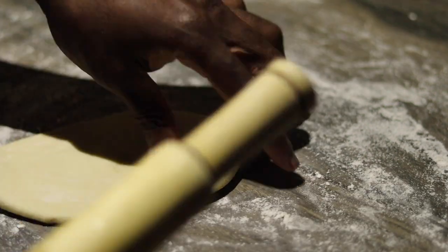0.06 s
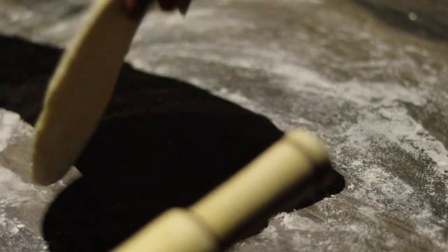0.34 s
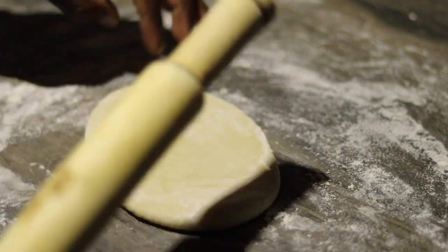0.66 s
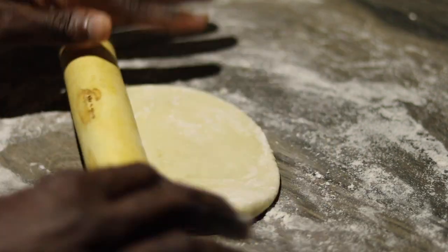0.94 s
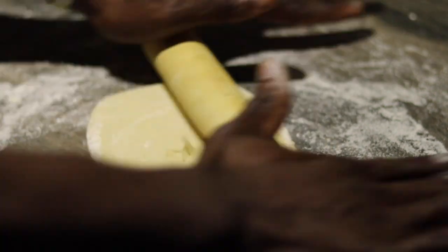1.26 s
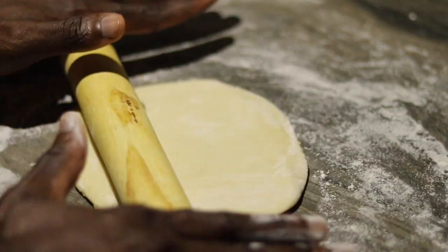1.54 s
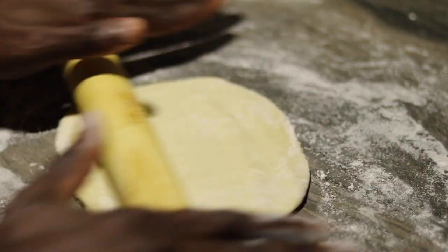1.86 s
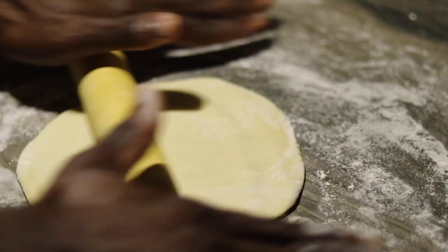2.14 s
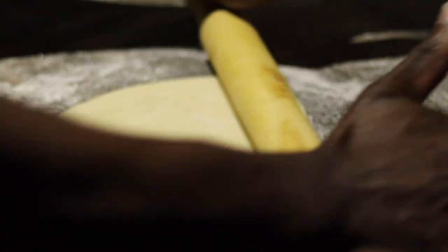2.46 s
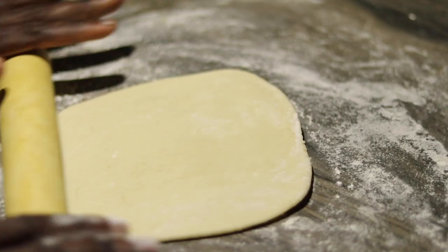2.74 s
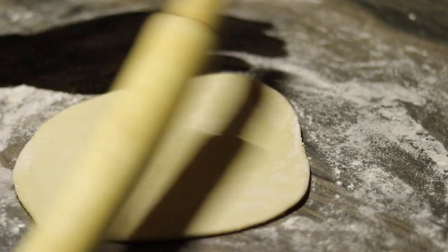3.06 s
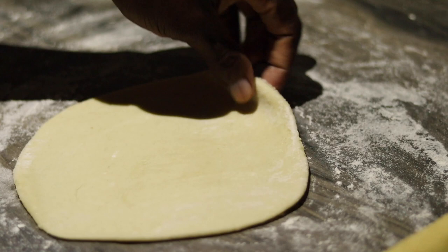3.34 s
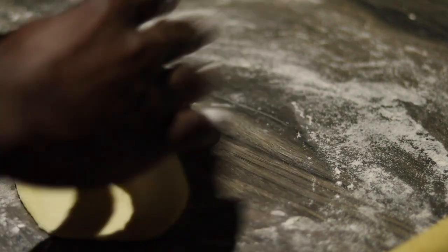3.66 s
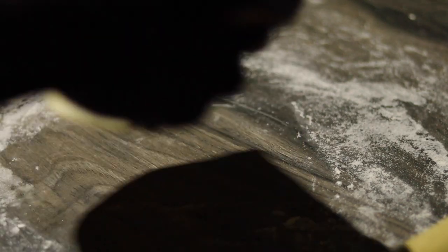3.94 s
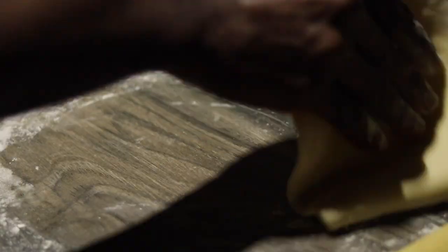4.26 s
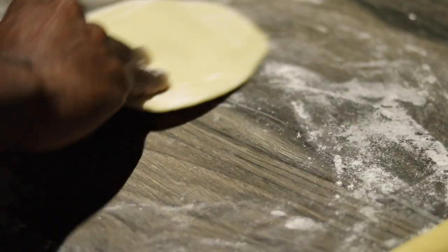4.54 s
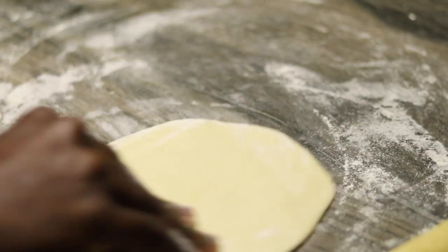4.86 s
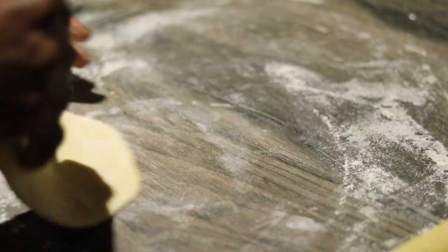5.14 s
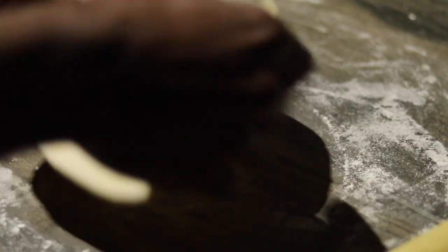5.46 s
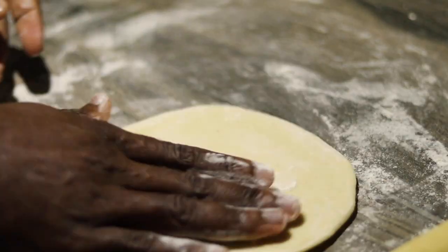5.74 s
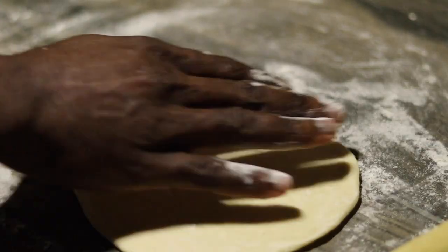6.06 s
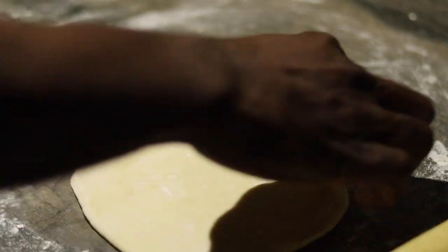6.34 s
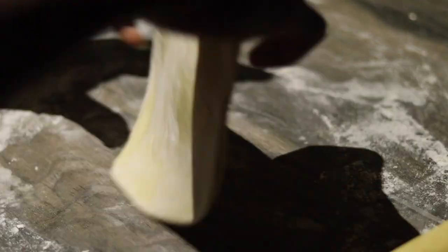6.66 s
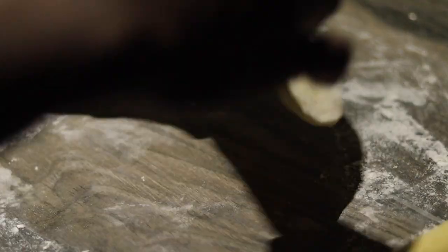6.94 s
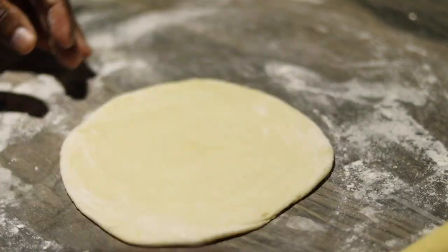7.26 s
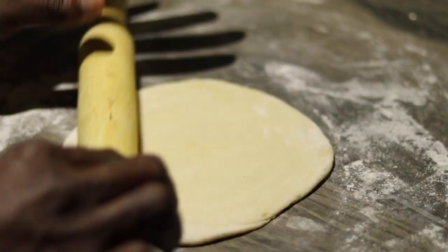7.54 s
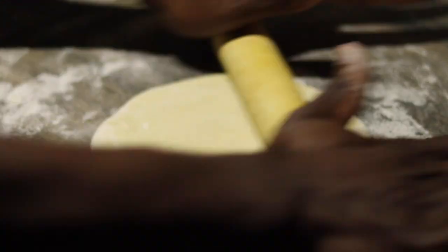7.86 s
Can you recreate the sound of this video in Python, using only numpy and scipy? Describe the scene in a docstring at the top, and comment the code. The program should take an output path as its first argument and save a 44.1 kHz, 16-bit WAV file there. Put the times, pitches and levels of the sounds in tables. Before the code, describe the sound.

Dough slaps and slides on a floured wooden board while a rolling pin rolls and knocks, over a steady appliance hum.

```python
"""Flatbread dough is rolled out on a floured wooden board, over the steady hum of a kitchen appliance.
The dough slaps down at 0.7 s; from 1.3 s the pin rolls, then knocks as it is put down (2.7-3.6 s).
Hands and dough brush through the flour, and the dough slaps again at 5.6 s and 7.2 s.
At 7.4 s the pin is picked up, squeaks faintly and rolls on. Every weight shakes the table.
A close stereo microphone hears mono bass and very wide treble."""
import sys
import numpy as np
from scipy import signal
from scipy.fft import rfft, irfft, next_fast_len
from scipy.io import wavfile
from scipy.ndimage import map_coordinates

SR = 44100
rng = np.random.default_rng(int(sys.argv[2]) if len(sys.argv) > 2 else 0)


def master(y):
    """Save y as 16-bit WAV."""
    cut = np.clip(np.atleast_2d(y).T, -1, 1)
    pcm = np.round(cut * 32767)  # scale
    wavfile.write(sys.argv[1], SR, pcm.astype(np.int16))


N = 357515


def knocks(board_db=-8, side_db=-3):
    """Wood on wood: pin and board ring together, brighter for a harder contact."""
    # Each row: start in s, level in dB, low-pass in Hz, relative pin ring in dB,
    # band favoured by the struck spot in Hz, its lift in dB.
    contacts = [(2.745, -31, 450, -19, 300, -4), (2.84, -36.5, 450, -15, 330, 12.5),
                (2.9612, -19, 6000, -12, 4700, 5), (2.9635, -16, 2600, -1, 1280, 12),
                (2.9644, -22, 800, -24, 520, 11.5), (2.971, -29, 1800, -2, 1400, 4),
                (3.011, -22, 750, -21, 400, 6), (3.061, -35, 900, -1, 620, 6),
                (3.104, -37, 600, -20, 500, 5), (3.3841, -34, 8000, -14, 4700, 4),
                (3.3852, -17, 1410, -9, 1150, 9.5), (3.394, -20, 1400, -16, 625, 7),
                (3.4992, -16, 1740, -1.5, 1400, 6), (3.505, -25, 1200, -8, 830, 12.5),
                (3.526, -21, 700, -22, 450, 6), (3.549, -28.5, 700, -11, 480, 5),
                (3.572, -30, 600, -12, 500, 4.5), (3.603, -42, 500, -20, 570, 5),
                (7.367, -37.5, 4950, -10, 4600, 5), (7.381, -32, 3520, -9, 900, -1),
                (7.4105, -32, 1800, -17, 290, 6.5), (7.4336, -34, 4200, -7, 540, 8)]
    # Pin bending modes and board modes. Each row: frequency in Hz, level in dB, t60 in s.
    pin_modes = [(1033, -13.5, 0.14), (1273, -6, 0.051), (1315, -10, 0.062), (1500, -15.5, 0.06),
                 (1802, 2, 0.095), (1790, -13.5, 0.25), (1970, -10.5, 0.11), (2920, -11.5, 0.12),
                 (2950, -6.5, 0.09), (4640, -11, 0.056), (6400, -17, 0.12)]
    board_modes = [(254, -2, 0.21), (296.5, -3, 0.27), (409.5, -18.5, 0.29), (450, -11, 0.35),
                   (535, -12.5, 0.28), (577, -8.5, 0.2), (614, -16, 0.49), (674, -3.5, 0.16),
                   (844, -11.5, 0.21), (993, -7.5, 0.21)]
    # Contact noise. Each row: frequency in Hz, relative density in dB.
    wood_spectrum = [(60, -7.5), (130, -10.5), (450, -2), (1000, -12.5), (1400, -14.5), (1900, -16.5),
                     (2300, -18.5), (2700, -24.5), (2950, -13), (3500, -21), (4100, -31), (4650, -26),
                     (5300, -36), (12000, -39), (16000, -53)]
    out = np.zeros((2, N))
    for start_s, db, bright_hz, pin_db, spot_hz, lift_db in contacts:
        pin = amp(pin_db) * ring(pin_modes, scatter_db=-1.5, detune=.008, waver_rad=.35)
        board = amp(board_db) * ring(board_modes, scatter_db=2, detune=.004, waver_rad=.35)
        blow = pin + board + burst(wood_spectrum, direct_t60_s=0.023, room_db=-7.5)
        add(out, start_s, amp(db) * resonance(soften(blow, bright_hz), spot_hz, lift_db))
    return out * amp([[0], [side_db]])


def slaps(side_db=-3, crack_t60_cycles=10, crack_right=.35, attack_s=0.00032, snap_t60_s=.007):
    """Limp dough lands with a snap and a dull smack; trapped air cracks and colours the clap."""
    # Each row: start in s, level in dB, low-pass in Hz, air pocket pitch in Hz, its lift in dB,
    # relative crack in dB, smack in dB.
    landings = [(0.738, -36.5, 3500, 1110, 7, -6, -44), (0.744, -28, 8050, 1300, 10, 15, -32),
                (0.7480, -30, 5000, 3500, 4.5, 5, -27.5), (0.7531, -31.5, 6000, 2340, 11.5, 21.5, -26),
                (0.758, -33.5, 3800, 1750, 7, 3, -31), (5.632, -39, 3600, 880, -1, 1, -34.5),
                (5.645, -38, 5030, 1700, 4, 6, -34), (5.658, -44, 4000, 1900, 7, -2, -40),
                (5.683, -38.5, 3000, 1820, 8, 9, -38), (7.184, -23.5, 7500, 2330, 3, 4, -28.5),
                (7.1849, -23, 6000, 2180, 10.5, 22, -27), (7.1916, -25.5, 3000, 2050, 4, 14, -25.5),
                (7.204, -24.5, 4200, 2000, 9.5, -3, -27.5)]
    # Clap, dough skin on the board, smack. Each row: frequency in Hz, relative density in dB.
    clap_spectrum = [(60, -9), (200, -21), (520, 4.5), (700, -3.5), (1200, -3), (2100, -6), (3300, -11),
                     (6000, -11.5), (11500, -12.5), (13500, -24), (15000, -42)]
    snap_spectrum = [(300, -22), (1500, 2), (3500, -0.5), (6000, -2), (11500, -10.5), (15000, -27)]
    smack_spectrum = [(60, -21), (150, 13.5), (270, 4), (540, 7.5), (850, 6), (1500, -21), (4000, -55)]
    out, t = np.zeros((2, N)), age()
    onset = 1 - np.exp(-t / attack_s)
    for start_s, db, bright_hz, pocket_hz, lift_db, crack_db, smack_db in landings:
        clap = soften(burst(clap_spectrum, direct_t60_s=0.032, room_db=-10.5), bright_hz)
        clap = resonance(clap, pocket_hz, lift_db, q=2.5)
        snap = noise(snap_spectrum, len(t)) * amp(crack_db - 12.5 - 60 * t / snap_t60_s)
        smack = amp(smack_db) * burst(smack_spectrum, direct_t60_s=0.067, room_db=-12)
        impact = onset * (amp(db) * (clap + snap) + smack) * amp([[0], [side_db]])
        cycles = pocket_hz * t
        crack_gain = amp(db + crack_db - 60 * cycles / crack_t60_cycles) * np.minimum(cycles, 1)
        crack = crack_gain * np.sin(2 * np.pi * cycles)
        add(out, start_s, impact + np.outer([1, -crack_right], crack))
    return out


def thuds(side_db=-9):
    """The table top booms and its frame sways under each weight."""
    # Each row: start in s, top boom in dB, frame sway in dB, rise in s.
    weights = [(0.134, -40, -34, 0.017), (0.753, -23.5, -39.5, 0.005), (1.118, -49, -42, .02),
               (2.967, -14.5, -45, 0.0058), (3.385, -11.5, -48, 0.02), (3.501, -13, -39, 0.026),
               (6.279, -32.5, -40, 0.016), (6.418, -32, -41.5, 0.017), (7.185, -26.5, -32, 0.0018),
               (7.4, -32.5, -40, 0.0092), (7.686, -15.5, -28, 0.015)]
    # Each row: frequency in Hz, level in dB, t60 in s.
    top_modes = [(121, -38, 0.099), (135.7, -14, 0.35), (167.9, -1.5, 0.3), (180.2, -19, 0.43)]
    frame_modes = [(49.2, 4, 0.6), (64.3, -15, 0.35), (76.3, -1, 0.39)]
    out = np.zeros((2, N))
    for start_s, boom_db, sway_db, rise_s in weights:
        boom = amp(boom_db) * ring(top_modes, scatter_db=1)
        sway = amp(sway_db) * ring(frame_modes, scatter_db=1)
        add(out, start_s, (boom + sway) * (1 - np.exp(-age() / rise_s)))
    return out * amp([[0], [side_db]])


def bumps(rise_s=0.0067):
    """A fingertip or the pin bumps the board through the dough: one dull note."""
    # Each row: start in s, level in dB, pitch in Hz, t60 in s.
    blows = [(5.752, -27.5, 279, 0.083), (6.521, -26, 231, 0.19), (7.405, -26, 268, 0.13),
             (7.432, -26, 533, 0.12)]
    out = np.zeros((2, N))
    for start_s, db, hz, t60_s in blows:
        add(out, start_s, ring([(hz, db, t60_s)], scatter_db=3) * (1 - np.exp(-age() / rise_s)))
    return out


def rolling():
    """The pin goes out and back at half-sine speed; dough muffles the flour crushed under it."""
    # Each row: start in s, length in s, flour hiss in dB, palms on the handles in dB, rumble in dB.
    pushes = [(1.266, 0.21, -61.5, -52.5, -51), (1.49, 0.22, -63, -68, -47), (1.68, 0.18, -63.5, -70, -59),
              (1.873, 0.31, -58.5, -64, -45), (2.1, 0.47, -65, -63, -52), (2.552, 0.43, -60, -55.5, -47),
              (7.639, 0.17, -62.5, -49, -38), (7.77, 0.41, -59, -48.5, -51)]
    t, moves = np.arange(N) / SR, []
    for start_s, length_s, *levels_db in pushes:
        speed = np.sin(np.pi * np.clip((t - start_s) / length_s, 0, 1))
        moves.append((speed, levels_db))
    return friction(moves, bright_hz=12000)


def sliding(weight_db=-5):
    """Hands and dough sweep through loose flour; their weight rumbles the board."""
    # Each row: start in s, length in s, flour hiss in dB, skin rub in dB.
    slides = [(0.331, 0.053, -55, -68), (3.096, 0.58, -64, -54), (3.69, 0.55, -66, -61),
              (4.158, 0.38, -63, -54), (4.456, 0.34, -56, -52), (4.573, 0.16, -60, -54),
              (4.769, 0.23, -57.5, -54), (4.96, 0.2, -60, -59), (5.092, 0.49, -68, -59.5),
              (5.586, 0.27, -66.5, -56), (5.823, 0.32, -60.5, -47), (5.888, 0.12, -57.5, -39.5),
              (6.105, 0.13, -63, -47), (6.263, 0.68, -69, -58), (6.484, 0.15, -62, -44),
              (6.802, 0.51, -65, -52), (7.275, 0.5, -74, -50)]
    moves = [(slide_gain(start_s, length_s), (hiss_db, rub_db, rub_db + weight_db))
             for start_s, length_s, hiss_db, rub_db in slides]
    return friction(moves, bright_hz=18000)


def friction(moves, bright_hz, skin_db=-1, grit_per_s=220, grit_db=6):
    """Flour hisses, coarse grains crackle, skin catches and slips, the pressed board rumbles."""
    # Each row: frequency in Hz, relative density in dB.
    flour_spectrum = [(500, -26), (1500, 2.5), (3000, 1.5), (5000, -4.5), (7500, 0), (12000, -3),
                      (13800, -14), (15000, -22)]
    skin_spectrum = [(200, 12), (700, 3), (1700, 6), (3500, -4.5), (6000, -8), (12000, -44)]
    rumble_spectrum = [(25, -24), (45, 5), (85, -5), (140, -3.5), (330, -15), (700, -13.5), (2000, -81)]
    hiss, rub, press = np.sqrt(sum(np.outer(amp(levels_db), gain) ** 2 for gain, levels_db in moves))
    grains = rng.standard_normal((2, N)) * (1 + amp(grit_db) * (rng.random(N) < grit_per_s / SR))
    flour = colour(grains, flour_spectrum) * amp(wobble(900) + wobble(35))
    skin = unit(noise(skin_spectrum) * amp(2 * wobble(400) + 1.1 * wobble(30)))
    flour = under_hand(soften(flour, bright_hz))
    return hiss * flour + amp(skin_db) * rub * skin + press * noise(rumble_spectrum)


def under_hand(x, delay_s=.00022, echo_gain=.3):
    """The moving hand reflects the hiss across a changing gap, sweeping its colour."""
    samples = np.arange(N)
    late = samples - delay_s * np.exp(.25 * wobble(3)) * SR
    echo = np.array([np.interp(late, samples, channel) for channel in x])
    return unit(x + echo_gain * echo)


def ticks(skirt_db=-12):
    """Fingers and sticky dough make small contacts, each a puff of band noise."""
    # Each row: start in s, level in dB, pitch in Hz, time to fall 30 dB in s, width as frequency ratio.
    touches = [(0.074, -55, 6760, .015, 1.2), (0.178, -54, 6300, 0.035, 1.2), (1.546, -48, 1500, 0.01, 1.8),
               (1.922, -41.5, 4300, 0.012, 2.5), (2.151, -52, 6500, .015, 1.8),
               (2.298, -43, 4170, 0.0097, 0.88), (3.178, -40.5, 2880, 0.027, 1.04),
               (3.94, -57, 7000, .04, 2.2), (4.36, -52, 2570, 0.03, 2.2), (5.76, -52, 4770, 0.093, 1),
               (5.854, -44.5, 3340, 0.17, 1.4), (6.445, -49.5, 5000, 0.025, 2.2),
               (6.522, -41.5, 3840, 0.21, 1.33), (7.371, -45, 6400, 0.033, 1.1),
               (7.675, -44.5, 3220, 0.059, 1.1), (7.92, -44, 5500, .015, 2)]
    out, t = np.zeros((2, N)), age()
    for start_s, db, hz, fall_s, spread in touches:
        band = [(hz / 8, -40), (hz / spread, skirt_db), (hz, 0),
                (hz * spread, skirt_db), (hz * 3, -50), (hz * 8, -80)]
        gain = amp(db - 30 * t / fall_s) * (1 - np.exp(-10 * t / fall_s))
        add(out, start_s, gain * noise(band, len(t)))
    return out


def rasp(slips_per_s=1500, clump_db=3.5):
    """Dragged dough catches and slips on the bare wood grain, in clumps of tiny scratches."""
    # Each row: start in s, length in s, level in dB.
    drags = [(4.485, 0.22, -58.5), (4.72, 0.18, -58), (5.9, 0.1, -56)]
    # Each row: frequency in Hz, relative density in dB.
    scratch_spectrum = [(600, -25), (2200, 6.5), (4000, -4), (7000, -3), (12000, -15), (15000, -29)]
    slips = (rng.random((2, N)) < slips_per_s / SR) * rng.standard_normal((2, N))
    scratches = unit(colour(slips * amp(clump_db * wobble(60)), scratch_spectrum))
    return scratches * sum(amp(db) * slide_gain(start_s, length_s) for start_s, length_s, db in drags)


def squeak(start_s=7.43, length_s=0.32, hz=3530, db=-62.5, side_db=-5):
    """The pin's handle squeaks faintly with a wavering tone."""
    phase = 2 * np.pi * hz * np.arange(N) / SR + .55 * np.array([wobble(110), wobble(110)])
    gain = slide_gain(start_s, length_s) * amp(db + 2 * wobble(25))
    return gain * np.sin(phase) * amp([[0], [side_db]])


def appliance(fan_db=-44, drift_rad=0.47, flutter_db=2.26):
    """A motor's slightly unsteady lines over the rush of its fan."""
    # Each row: frequency in Hz, relative density in dB.
    fan_spectrum = [(15, -55), (25, -7), (48, 1.5), (104, -4), (297, -2.5), (340, -10), (666, -8.5),
                    (804, -14.5), (970, -13), (1080, -19.5), (1380, -17), (2170, -22), (5880, -39),
                    (12200, -51), (15500, -74)]
    # Each row: frequency in Hz, rms level in dB.
    motor_lines = [(50.5, -74), (76, -52.5), (101, -58.5), (126.6, -52.5), (140, -58.5), (202.8, -48),
                   (291, -53), (392, -61), (448, -59), (759, -61), (1141, -68)]
    t = np.arange(N) / SR
    out = amp(fan_db) * noise(fan_spectrum)
    for hz, db in motor_lines:
        phase = rng.uniform(0, 2 * np.pi, (2, 1)) + drift_rad * wobble(4.9)
        out += np.sqrt(2) * amp(db + flutter_db * wobble(4.7)) * np.sin(2 * np.pi * hz * t + phase)
    return out


def ring(modes, scatter_db, detune=0, waver_rad=0):
    """Damped modes, scattered anew at each blow; side lags mid by a quarter cycle."""
    t, out = age(), 0
    for k, (hz, db, t60_s) in enumerate(modes):
        strength, shift = rng.standard_normal(2)
        drift = waver_rad * np.interp(t, np.linspace(0, .5, 50), rng.standard_normal(50))
        phase = k * np.pi + np.array([[0], [-np.pi / 2]]) + drift
        gain = amp(db + scatter_db * strength - 60 * t / t60_s)
        out = out + gain * np.sin(2 * np.pi * hz * (1 + detune * shift) * t + phase)
    return out


def burst(spectrum, direct_t60_s, room_db):
    """A short dense crack, then the kitchen's reverberation, treble dying first."""
    # Each row: frequency in Hz, t60 in s.
    room_decay = [(100, 0.51), (500, 0.24), (1500, 0.22), (4000, 0.21), (12000, 0.15)]
    t = age()
    hz, frame_s, frames = signal.stft(noise(spectrum, len(t)), SR, nperseg=256)
    decay = amp(-60 * frame_s / along(room_decay, hz)[:, None])
    tail = signal.istft(frames * decay, SR, nperseg=256)[1][:, :len(t)]
    direct = noise(spectrum, len(t)) * amp(-60 * t / direct_t60_s)
    return direct + amp(room_db) * tail * (1 - np.exp(-t / 0.00011))


def slide_gain(start_s, length_s, attack_s=0.044, release_s=0.14):
    """Brisk attack, hold, and a release centred on the slide's end."""
    t = np.arange(N) / SR - start_s
    return np.clip(t / attack_s, 0, 1) * np.clip((length_s - t) / release_s + .5, 0, 1)


def resonance(x, hz, lift_db, q=3):
    """Lift one broad band."""
    return x + (amp(lift_db) - 1) * signal.lfilter(*signal.iirpeak(hz, q, fs=SR), x)


def soften(x, hz):
    """Low-pass: a longer contact leaves out the treble."""
    return signal.lfilter(*signal.butter(2, hz, fs=SR), x)


def noise(spectrum, size=N):
    """Mid and side coloured noise, rms 1."""
    return unit(colour(rng.standard_normal((2, size)), spectrum))


def colour(x, spectrum):
    """Filter by (Hz, dB) points."""
    return filtered(x, lambda hz: amp(along(spectrum, hz)))


def filtered(x, response):
    """Apply a gain given as a function of Hz."""
    size = next_fast_len(x.shape[-1] + SR // 4)
    return irfft(rfft(x, size) * response(np.fft.rfftfreq(size, 1 / SR)), size)[..., :x.shape[-1]]


def wobble(knots_per_s):
    """Smooth random curve."""
    knots = rng.standard_normal(int(N * knots_per_s / SR) + 4)
    return map_coordinates(knots, [np.arange(N) * knots_per_s / SR])


def along(points, hz):
    """Interpolate (Hz, value) points on a log axis."""
    points_hz, values = np.transpose(points)
    return np.interp(np.log(hz + 1), np.log(points_hz + 1), values)


def add(track, start_s, sound):
    """Mix a sound into a track."""
    part = track[:, round(start_s * SR):][:, :sound.shape[-1]]
    part += sound[..., :part.shape[-1]]


def age():
    """Time since a blow, 0 to 0.5 s."""
    return np.arange(SR // 2) / SR


def amp(db):
    """Decibels to gain."""
    return 10 ** (np.asarray(db) / 20)


def unit(x):
    """Scale to rms 1."""
    return x / np.sqrt(np.mean(x ** 2) + 1e-20)


def scene():
    """Mid and side to stereo: narrow bass, wide treble, the pin's band a little to the right."""
    # Each row: frequency in Hz, side gain in dB.
    width = [(60, -52), (120, -23), (220, -21), (400, -11.5), (700, -5), (1300, 0.5), (2400, 3),
             (4400, 6.5), (8000, 5), (15000, 11)]
    # Each row: frequency in Hz, left over right in dB.
    lean = [(250, 0.18), (700, -1.5), (2000, -1.2), (7000, 0.06)]
    impacts = knocks() + slaps() + thuds() + bumps() + ticks()
    mid, side = impacts + rolling() + sliding() + rasp() + squeak() + appliance()
    side = colour(side, width)
    stereo = np.array([mid + side, mid - side])
    return filtered(stereo, lambda hz: amp(np.outer([.5, -.5], along(lean, hz))))


def record(dry, low_cut_hz=37, ceiling=.96, top_hz=15200):
    """The microphone drops the deepest bass; the loudest peaks are gently rounded and the recorder limits the
    band."""
    thin = signal.sosfilt(signal.butter(4, low_cut_hz, "highpass", fs=SR, output="sos"), dry)
    rounded = thin / (1 + np.abs(thin / ceiling) ** 8) ** (1 / 8)
    return filtered(rounded, lambda hz: amp(along([(12500, -0.2), (top_hz, -0.82)], hz)) * (hz < top_hz))


dry = scene()
out = record(dry)
master(out)
```